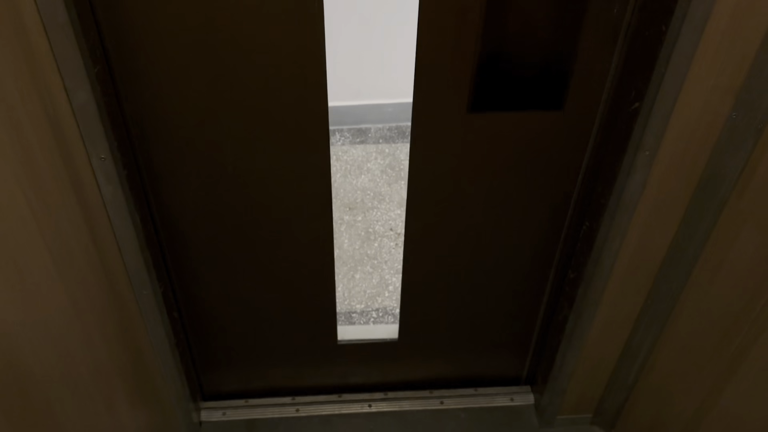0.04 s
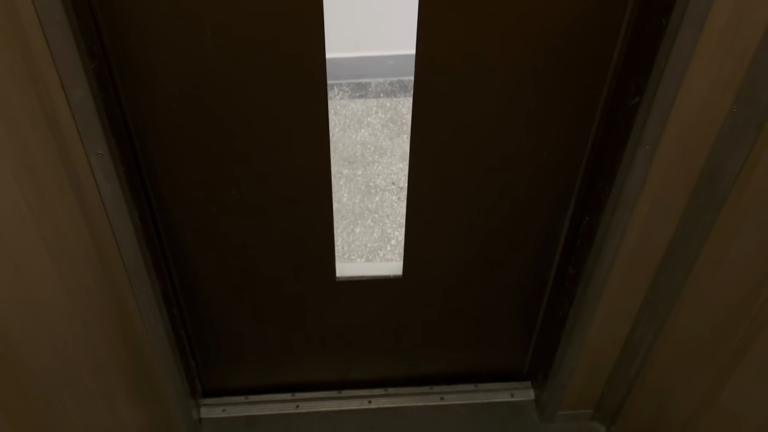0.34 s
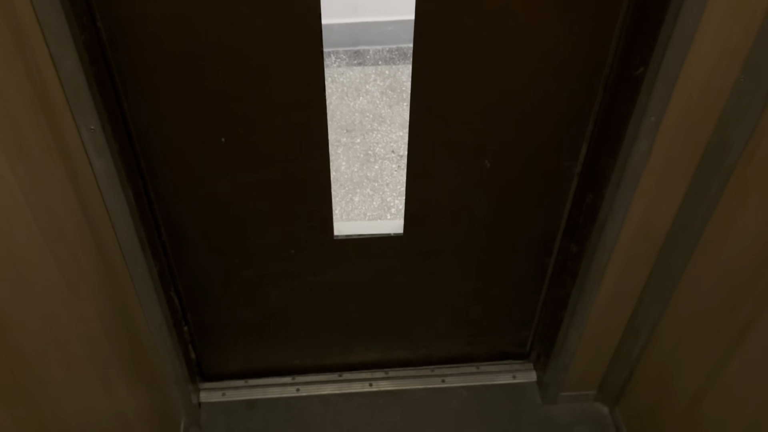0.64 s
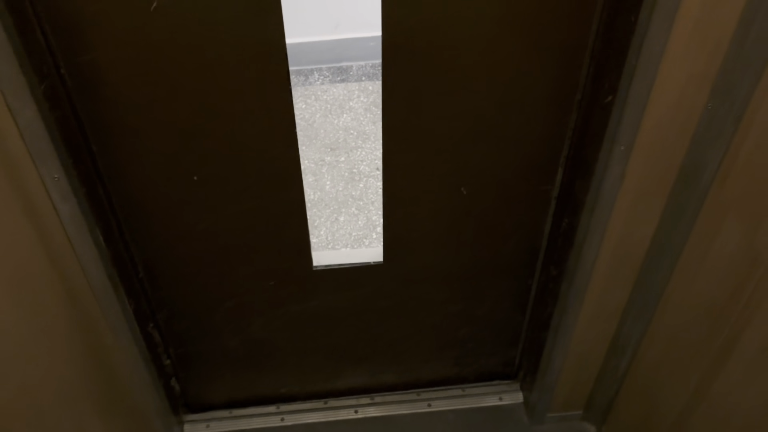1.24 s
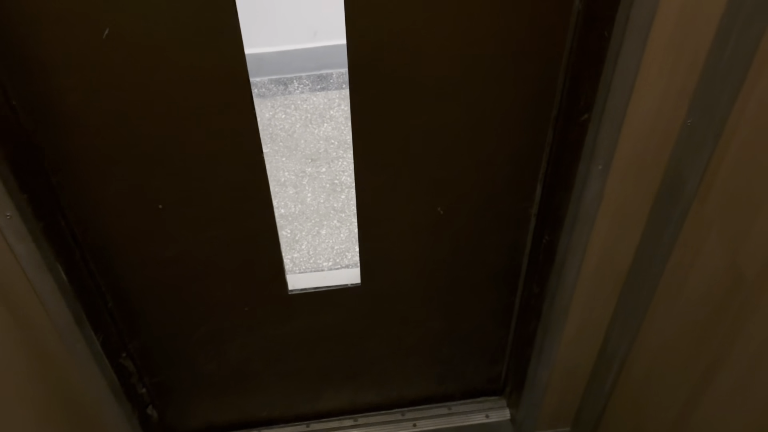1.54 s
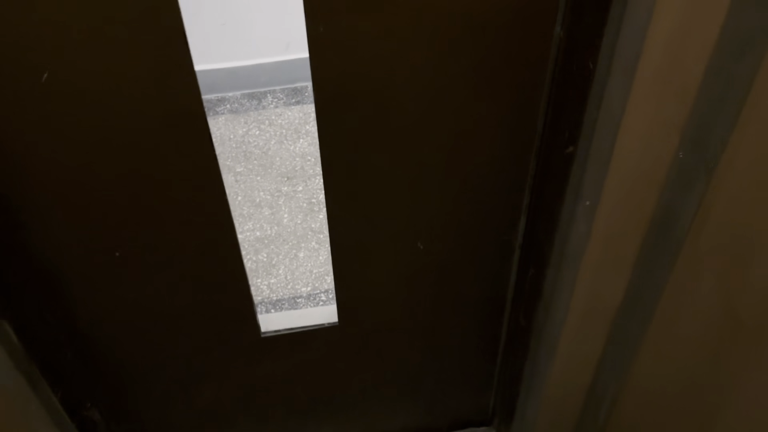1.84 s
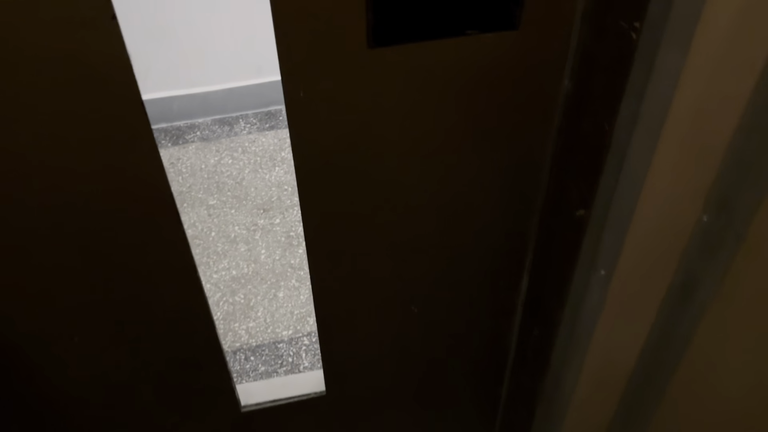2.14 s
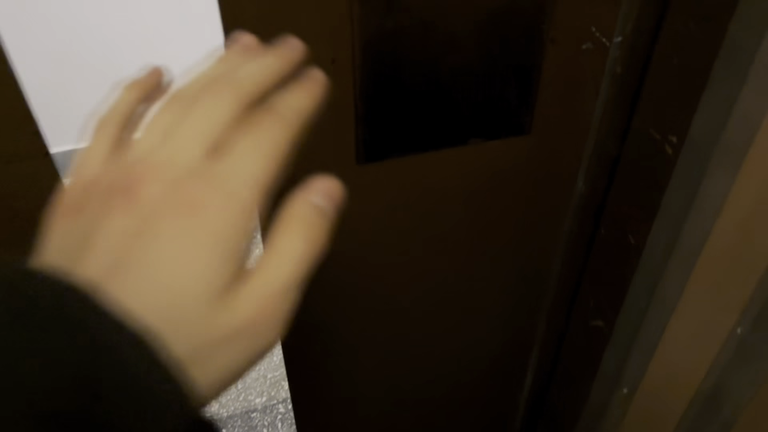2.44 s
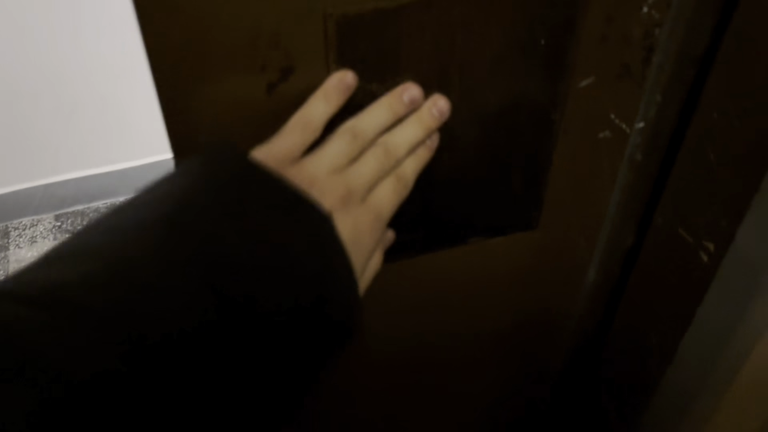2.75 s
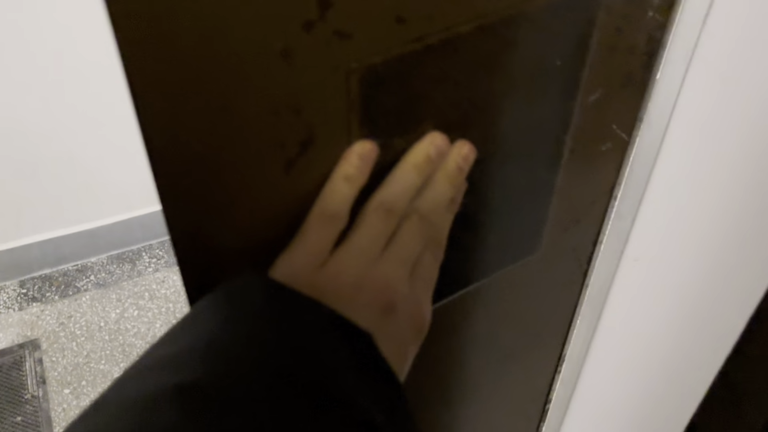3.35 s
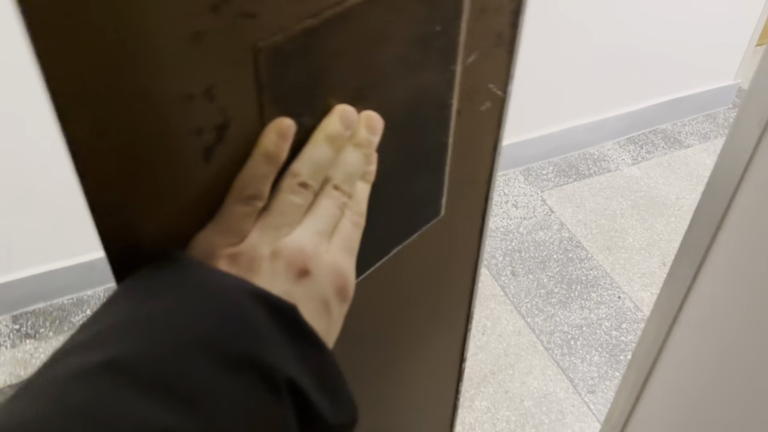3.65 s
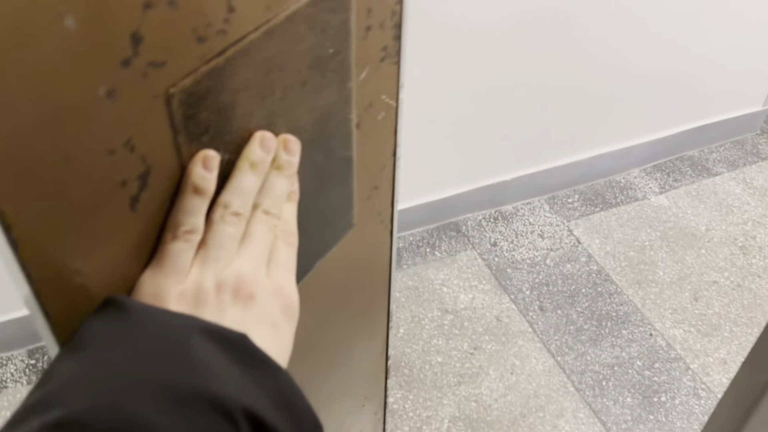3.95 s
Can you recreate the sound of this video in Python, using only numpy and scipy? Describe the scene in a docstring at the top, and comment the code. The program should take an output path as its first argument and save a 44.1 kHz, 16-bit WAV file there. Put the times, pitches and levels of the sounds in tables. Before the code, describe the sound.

An old lift hums low and stops with a loud, rattling metal clunk. After faint ticks and a sleeve rustle, its steel door clacks off the catch and swings, shuddering, into a quiet stairwell. Heard close, from inside.

```python
"""A low hum ends in a slam: an old lift halts, brake and door lock rattle, the car booms itself out.
A sleeve rustles, the floor thuds, dry ticks sound close by. A palm pushes the steel door off its
catch and it swings, shuddering, into a quiet stairwell.
Each blow is a burst of small contacts feeding a dense steel ring (decaying noise bands) and a few
strong modes (decaying sines). Car and door panel shake as narrow noise resonances."""
import sys
import numpy as np
from scipy import signal
from scipy.io import wavfile
from scipy.ndimage import uniform_filter1d

SR = 44100
rng = np.random.default_rng(int(sys.argv[2]) if len(sys.argv) > 2 else 0)


def materialize(psi):
    """Save the field psi as 16-bit PCM at rate SR to the path in sys.argv[1].

    A 1-D psi becomes a single channel; in a 2-D psi each row is a channel.
    """
    bounded = np.clip(np.atleast_2d(psi).T, -1, 1)
    quanta = np.round(bounded * 32767).astype(np.int16)
    wavfile.write(sys.argv[1], SR, quanta)


N = 176400
T = np.arange(N) / SR
BASS_HZ, TREBLE_HZ = 365, 1950  # shelf corners of a blow
# Each row: frequency in Hz, left-right correlation from -1 to 1.
STEREO_CORRELATION = [(70, 0.4), (140, 0.78), (300, 0.69), (550, 0.28), (1000, 0.22), (2200, 0.31),
                      (4500, 0.49), (8000, 0.55), (12500, 0.22)]


def amp(db):
    """Decibels to gain."""
    return 10 ** (np.asarray(db) / 20)


def unit(x):
    """Scale to rms 1."""
    return x / np.sqrt(np.mean(x ** 2) + 1e-20)


def add(out, start_s, x):
    """Mix x into out."""
    i = int(start_s * SR)
    out[..., i:i + x.shape[-1]] += x[..., :N - i]


def in_time(rows):
    """Columns of a time curve at every sample."""
    times_s, *columns = np.transpose(rows)
    return [np.interp(T, times_s, column) for column in columns]


def at_hz(rows, hz):
    """Read a table on a log-frequency axis."""
    freqs_hz, values = np.transpose(rows)
    return np.interp(np.log(hz), np.log(freqs_hz), values)


def filt(x, hz, kind, order=2):
    """Butterworth filter."""
    sos = signal.butter(order, np.clip(hz, 10, .47 * SR), kind, fs=SR, output="sos")
    return signal.sosfilt(sos, x + 1e-18)


def drift(rate_hz):
    """Random wander, rms 1."""
    count = int(rate_hz * T[-1]) + 2
    return unit(np.interp(T * rate_hz, np.arange(count), rng.standard_normal(N)[:count]))


def bands():
    """Third-octave bands of stereo noise, equally strong per Hz."""
    edges_hz = 28 * 2 ** (np.arange(29) / 3)
    white = rng.standard_normal((2, 2, N + 4000))
    for k, (low, high) in enumerate(zip(edges_hz, edges_hz[1:])):
        mid, side = filt(white[k % 2], [low, high], "band")[:, -N:]
        hz = np.sqrt(low * high)
        alike = at_hz(STEREO_CORRELATION, hz)
        yield hz, np.sqrt(1 + alike) * mid + np.sqrt(1 - alike) * side * [[1], [-1]]


def noise(colour):
    """Coloured stereo noise, rms 1."""
    return unit(sum(amp(at_hz(colour, hz)) * band for hz, band in bands()))


def shaking(resonances):
    """Noise-driven resonances, slow level evened out."""
    out = 0
    for hz, width_hz, db in resonances:
        band = filt(rng.standard_normal(N + SR), [hz - width_hz / 2, hz + width_hz / 2], "band", order=1)
        out += amp(db) * unit(band[SR:])
    out = filt(out, resonances[-1][0] * 1.326, "low", order=4)
    return out / np.sqrt(uniform_filter1d(out ** 2, size=3500) + 1e-12)


def ringing(modes, base_t60_s, swell_cycles=1.44, damping_hz=2940):
    """Modes swell and decay, left and right out of phase; higher ones die sooner."""
    out, t = 0, T[:SR]
    for hz, db in modes:
        offset_rad = np.arccos(at_hz(STEREO_CORRELATION, hz)) / 2 * rng.choice([-1, 1])
        swell = 1 - np.exp(-t * hz / swell_cycles)
        decay = np.exp(-np.log(1000) * t / base_t60_s * np.hypot(1, hz / damping_hz))
        out += amp(db) * swell * decay * np.sin(2 * np.pi * hz * t + offset_rad * np.array([[1], [-1]]))
    return out


def leak(power, t60_s):
    """Stored energy decays exponentially."""
    return signal.lfilter([1], [1, -np.exp(-2 * np.log(1000) / (t60_s * SR))], power + 1e-18)


def rattle(rise_s, contacts_per_s=590):
    """Contact energy within one blow: builds, then dies out."""
    t = T[:SR // 6] / rise_s
    chance = contacts_per_s / SR
    contacts = rng.random(len(t)) < chance
    power = (contacts + 0.19 * chance) * (t * np.exp(-t)) ** 2
    return power / power.sum()


def dense_ring(blows, colour, t60s, wet_db, dull_hz=3730):
    """Rattling blows feed the steel's dense ring and the stairwell's longer, duller tail."""
    # Each row: frequency in Hz, T60 in seconds.
    stairwell_t60s = [(400, 1.4), (2000, 0.67), (10000, 0.6)]
    out, rattles = 0, [rattle(blow[-1]) for blow in blows]
    for hz, band in bands():
        bass, treble = 1 / (1 + (hz / BASS_HZ) ** 2), 1 / (1 + (TREBLE_HZ / hz) ** 2)
        power = np.zeros(N)
        for (start_s, db, bass_db, treble_db, _), energy in zip(blows, rattles):
            add(power, start_s, energy * amp(db + bass * bass_db + treble * treble_db) ** 2)
        steel = leak(power, at_hz(t60s, hz))
        tail = leak(power, at_hz(stairwell_t60s, hz)) * amp(wet_db) ** 2 / (1 + (hz / dull_hz) ** 2)
        out += amp(at_hz(colour, hz)) * band * np.sqrt(steel + tail)
    return out


def struck_modes(blows, modes, base_t60_s):
    """Each blow rings the strong modes; a soft one barely reaches the high ones."""
    out = np.zeros((2, N))
    for start_s, db, _, treble_db, rise_s in blows:
        tilted = [(hz, mode_db + treble_db / (1 + (TREBLE_HZ / hz) ** 2)) for hz, mode_db in modes]
        add(out, start_s + rise_s * rng.uniform(0.49, 2), amp(db) * ringing(tilted, base_t60_s))
    return out


def stairwell_air(level_db=-52):
    """Still air: faint, steady low noise."""
    # Each row: frequency in Hz, relative density in dB.
    colour = [(35, -16), (85, 2.5), (250, -5.5), (700, -19.5), (2000, -25), (14000, -48)]
    return amp(level_db) * noise(colour)


def sleeve(gain_db=3.5):
    """Cloth slides over cloth as the arm moves."""
    # Each row: time in seconds, relative level in dB.
    levels = [(.4, -86), (.82, -52.5), (.97, -64), (1.25, -66), (1.53, -53), (1.85, -68), (2.35, -55.5),
              (2.59, -48), (2.75, -56.5), (3.35, -62), (3.9, -54)]
    # Each row: frequency in Hz, relative density in dB.
    colour = [(150, 15), (500, 0.5), (1500, -1.5), (3000, -6.5), (7500, -6.5), (16000, -10)]
    return amp(in_time(levels)[0] + gain_db + 0.74 * drift(130)) * noise(colour)


def ticks(gain_db=-13.5, band_hz=(323, 4500), hollow_hz=525, chirp_hz=870):
    """Dry, hollow clicks; the highs arrive first, so each chirps downward."""
    # Each row: start in seconds, relative level in dB, low-pass corner in Hz.
    events = [(1.072, -4, 2500), (1.558, -0.5, 895), (1.638, 5, 1000), (2.066, 0.5, 900),
              (2.214, -5.5, 900), (2.593, 0.5, 390)]
    clicks = np.zeros(N)
    for start_s, db, corner_hz in events:
        click = filt(signal.unit_impulse(SR // 20), corner_hz, "low", order=1)
        add(clicks, start_s, amp(db + gain_db) * np.sqrt(TREBLE_HZ / corner_hz) * click)
    hollow = filt(clicks, [hollow_hz / np.sqrt(2), hollow_hz * np.sqrt(2)], "band")
    out = filt(clicks, band_hz, "band", order=1) + amp(3.5) * hollow
    pole = np.exp(-2 * np.pi * chirp_hz / SR)
    for _ in range(6):  # all-passes delay the lows
        out = signal.lfilter([-pole, 1], [1, -pole], out)
    return out


def chinks():
    """Loose steel parts each ring with a tight cluster of modes."""
    # Each row: start in seconds, centre in Hz, relative level in dB.
    parts = [(0.764, 4250, -51), (0.863, 2830, -49.5), (2.961, 3270, -40), (3.035, 12760, -37.5)]
    out = np.zeros((2, N))
    for start_s, hz, db in parts:
        cluster = [(hz * 2 ** (rng.normal() / 10), db) for _ in range(6)]
        add(out, start_s, ringing(cluster, base_t60_s=0.17) / 2)
    return out


def hinge_squeak(roughness=0.13):
    """The hinge gives a faint, rough, rising tone."""
    # Each row: time in seconds, pitch in Hz, level in dB.
    glide = [(3.8, 1278, -68), (4, 2186, -51.5)]
    hz, db = in_time(glide)
    level = (T > glide[0][0]) * amp(db + 2.9 * drift(80))
    phase = 2 * np.pi * np.cumsum(hz * (1 + roughness * drift(600))) / SR
    return level * np.sin(phase)


def door_swing(onset_s=0.025):
    """The pushed panel shudders and its hinge rubs."""
    # Each row: frequency in Hz, width in Hz, relative level in dB.
    resonances = [(142, 19, 0.5), (253.4, 20, -10), (384.5, 58, -13.5)]
    # Each row: time in seconds, relative level in dB.
    shudder_levels = [(2.7, -32), (2.77, -34.5), (2.96, -40), (3.03, -28.5), (3.12, -27.5), (3.26, -32),
                      (3.34, -40), (3.77, -46.5), (3.83, -37.5), (4, -41.5)]
    rub_levels = [(2.7, -56), (3.1, -37.5), (3.45, -52), (3.55, -50.5), (3.75, -56), (3.95, -51)]
    # Each row: frequency in Hz, relative density in dB.
    rub_colour = [(200, 3), (450, 2.5), (1400, -0.5), (5000, -67)]
    pushed = np.clip((T - shudder_levels[0][0]) / onset_s, 0, 1)
    mid, side = shaking(resonances), amp(-18) * shaking(resonances)
    shudder = amp(in_time(shudder_levels)[0]) * (mid + side * [[1], [-1]])
    rub = amp(in_time(rub_levels)[0] - 2) * noise(rub_colour)
    return pushed * (shudder + rub)


def drive_hum(pitch_hz=80.78, waver=0.0094, flutter_db=2):
    """The drive hums, wavering, and fades as the brake bites."""
    # Each row: time in seconds, rms level in dB.
    levels = [(0, -19), (.38, -20), (.47, -20.5), (.8, -88)]
    phase = 2 * np.pi * np.cumsum(pitch_hz * (1 + waver * drift(41))) / SR
    return np.sqrt(2) * amp(in_time(levels)[0] + flutter_db * drift(37)) * np.sin(phase)


def car_shake(gain_db=0.5):
    """The car's air and floor resonances rumble."""
    # Each row: time in seconds, relative level in dB.
    levels = [(0, -25.5), (.5, -22.5), (.65, -28), (.85, -24.5), (1, -34), (1.45, -45.5), (1.95, -48.5),
              (2.3, -43.5), (2.7, -41.5), (3.15, -35.5), (3.5, -53), (4, -47)]
    # Each row: frequency in Hz, width in Hz, relative level in dB.
    resonances = [(50, 8.9, -8), (61, 11, -14.5), (86.5, 7.9, -8)]
    return amp(in_time(levels)[0] + gain_db) * shaking(resonances)


def floor_thuds(rise_s=0.026, octave_db=-20):
    """Soft thuds boom in the floor: a low tone and its faint octave."""
    # Each row: start in seconds, peak in dB, pitch in Hz.
    thuds = [(0.511, -12.5, 63), (0.516, -17, 132), (0.805, -17.5, 71.3), (1.996, -15.5, 83.2),
             (2.226, -32, 88.6), (2.527, -27.5, 78.6), (2.578, -24.5, 68), (3.791, -30, 98.7)]
    out, t = np.zeros(N), T[:SR // 2]
    envelope = (t / rise_s * np.exp(1 - t / rise_s)) ** 4
    for start_s, db, hz in thuds:
        boom = np.sin(2 * np.pi * hz * t) + amp(octave_db) * np.sin(4 * np.pi * hz * t)
        add(out, start_s, amp(db) * envelope * boom)
    return out


def door_catch():
    """The door grates off its catch with a loud clack; the spring twangs and the panel booms."""
    # Each row: start in seconds, relative level, bass and treble in dB, rattle rise in seconds.
    blows = [(2.714, -26, 1, -16, 0.0035), (2.768, -14, -21, 0.5, 0.00507),
             (2.817, -24.5, 25.5, 12.5, 0.0076), (2.875, -20.5, -25, 11, 0.0053),
             (2.928, -17.5, -11, 12, 0.0026), (2.96, -8.5, -4, -4, 0.00447),
             (3.033, 2.5, -7.5, -5, 0.00315), (3.141, -14, 1, -11, 0.0037)]
    # Each row: frequency in Hz, T60 in seconds.
    t60s = [(150, 0.67), (1000, 0.15), (10000, 0.16)]
    # Each row: frequency in Hz, relative level in dB.
    colour = [(60, -19), (150, -2), (450, 1.5), (750, 0.5), (1300, -2.5), (2350, -5.5), (3400, -19.5),
              (7500, -27.5), (12000, -30.5), (16000, -34)]
    door_modes = [(151, 5), (275, -3.5), (395, 0.5), (544, -6.5)]
    spring_modes = [(875, -22), (935, -30), (1200, -28.5)]
    out = amp(-14) * dense_ring(blows, colour, t60s, wet_db=-37)
    out += amp(-32) * struck_modes(blows, door_modes, base_t60_s=0.73)
    add(out, 2.962, ringing(spring_modes, base_t60_s=0.14))
    return out


def brake_and_lock():
    """The brake clangs shut; lock and shaft gear slam and rattle."""
    # Each row: start in seconds, relative level, bass and treble in dB, rattle rise in seconds.
    blows = [(.044, -24.5, 17.5, -44, .005), (.116, -42, -7, 5, 0.0048), (.354, -13.5, -1, -40, 0.00301),
             (.385, -27, 0, 10.5, 0.009), (.425, -3.5, 2, 2, .008), (.499, 3.5, -4, -7.5, .007),
             (.86, -32.5, 15.5, -13, .005)]
    # Each row: frequency in Hz, T60 in seconds.
    t60s = [(150, 0.87), (1000, 0.2), (10000, 0.28)]
    # Each row: frequency in Hz, relative level in dB.
    colour = [(60, -4), (170, 4.5), (360, 6), (550, 1), (1100, 1.5), (2600, 1), (5000, -7), (8300, -11.5),
              (12500, -22), (16000, -35)]
    lock_modes = [(146, 5.5), (248, 5), (376, 5.5), (632, -4.5), (728, -5.5), (1095, 0), (1291, -3),
                  (1407, -1), (1857, -1), (2088, -9), (2612, -0.5), (2790, -8)]
    brake_modes = [(368, -7), (732, -14.5), (965, -18.5), (2530, -24)]
    out = amp(-7) * dense_ring(blows, colour, t60s, wet_db=-16.5)
    out += amp(-23.5) * struck_modes(blows, lock_modes, base_t60_s=0.32)
    add(out, 0.429, ringing(brake_modes, base_t60_s=0.18))
    return out


def scene():
    """Lift, door and small sounds over the stairwell air."""
    lift = drive_hum() + car_shake() + floor_thuds() + brake_and_lock()
    door = door_catch() + door_swing() + hinge_squeak()
    return lift + door + chinks() + ticks() + sleeve() + stairwell_air()


def record(dry, notch_hz=(9000, 10900), cutoff_hz=14700):
    """Round the peaks, notch the treble, cut the top."""
    rounded = 1.2 * np.tanh(dry / 1.2)
    notched = filt(rounded, notch_hz, "stop", order=4)
    return signal.sosfilt(signal.ellip(10, .1, 90, cutoff_hz, fs=SR, output="sos"), notched)


dry = scene()
out = record(dry)
materialize(out)
```